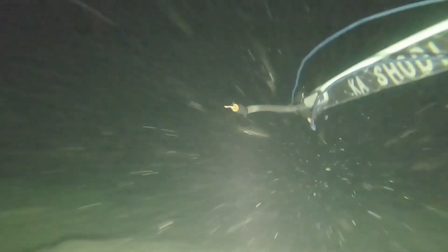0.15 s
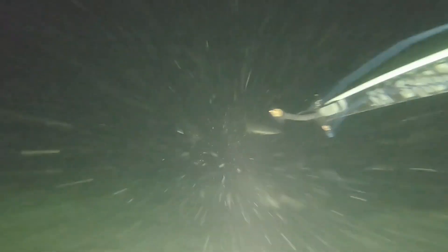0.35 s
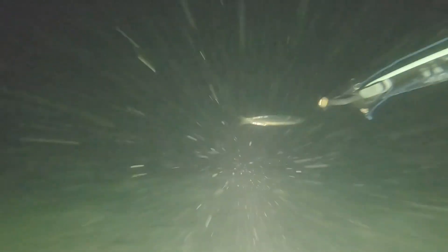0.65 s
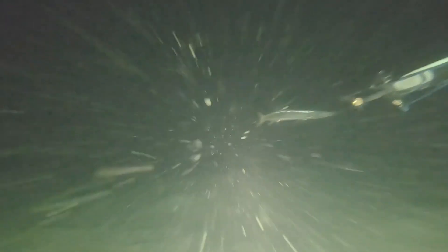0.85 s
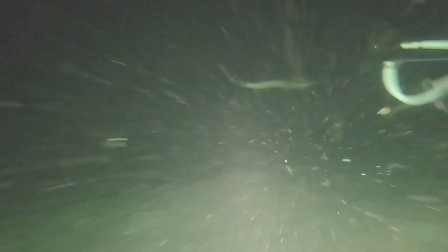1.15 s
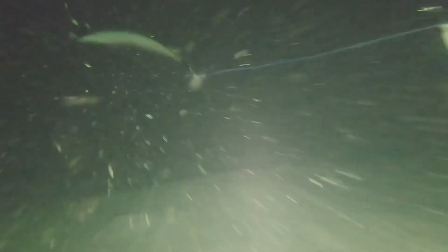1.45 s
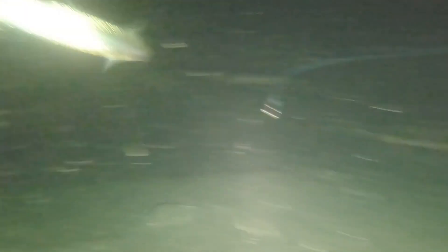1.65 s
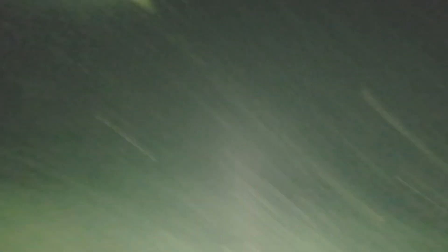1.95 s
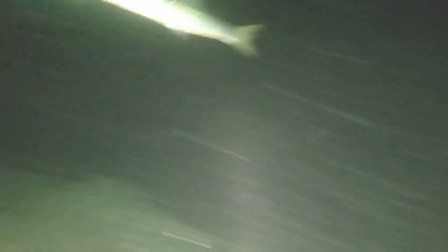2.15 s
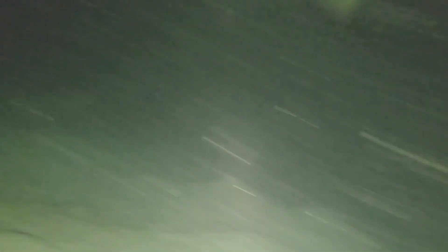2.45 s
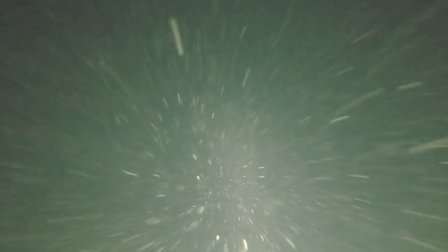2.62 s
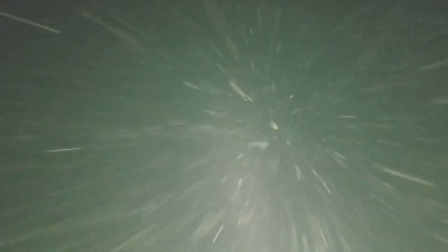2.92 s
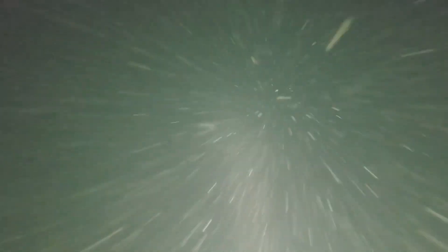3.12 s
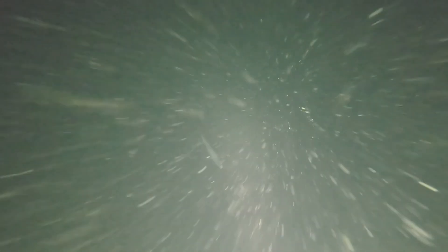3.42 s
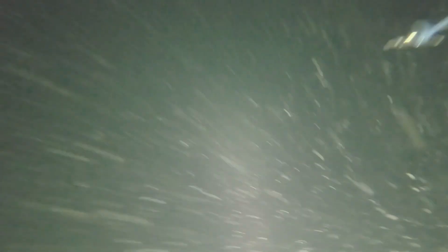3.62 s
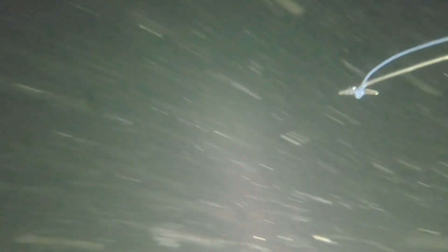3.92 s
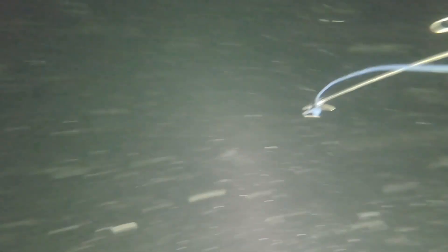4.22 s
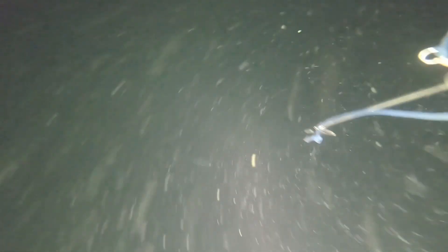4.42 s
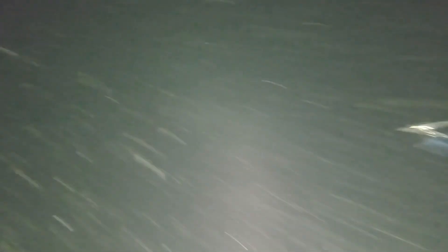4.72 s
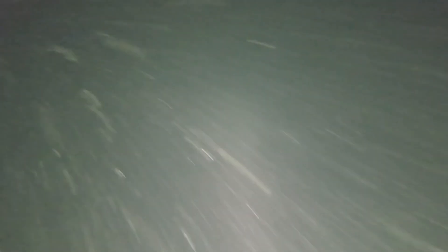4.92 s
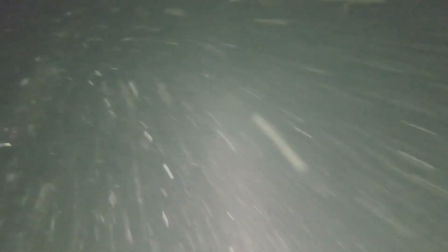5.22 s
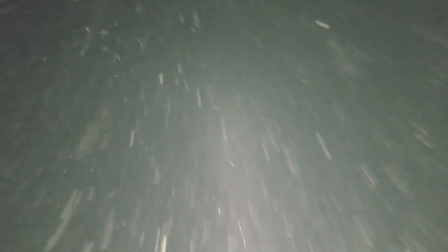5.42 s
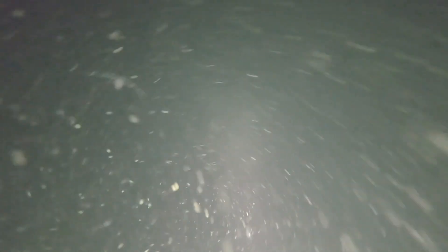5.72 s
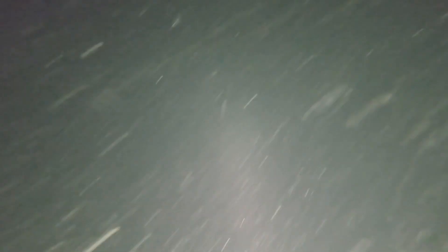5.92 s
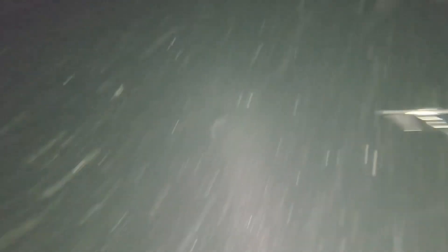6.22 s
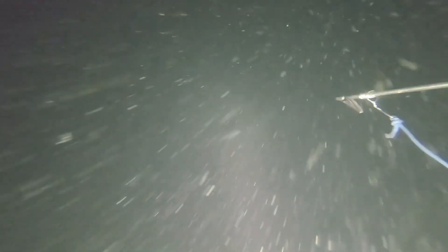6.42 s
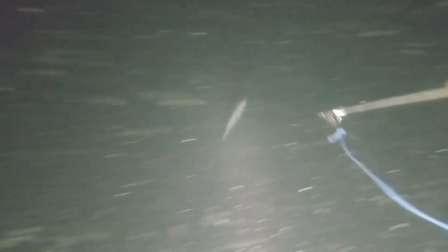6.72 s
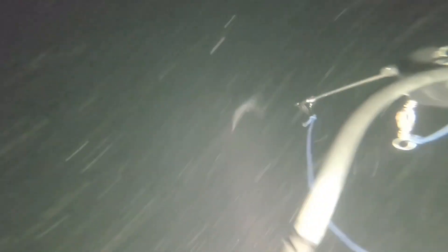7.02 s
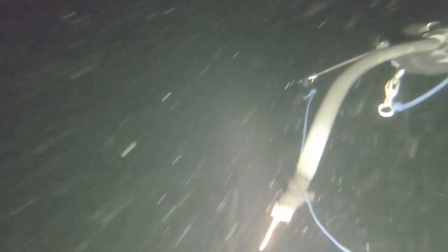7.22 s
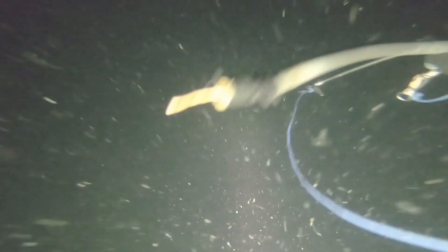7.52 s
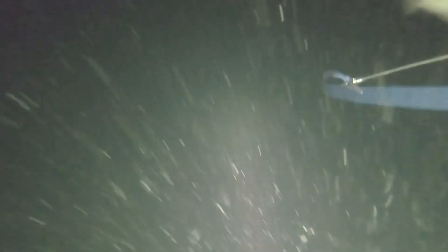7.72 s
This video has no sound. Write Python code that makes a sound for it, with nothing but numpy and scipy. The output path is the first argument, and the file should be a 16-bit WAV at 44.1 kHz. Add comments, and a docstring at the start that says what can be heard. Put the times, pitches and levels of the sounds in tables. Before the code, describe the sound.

Murky water gurgles and rustles around an enclosed camera microphone, with grit ticking and a faint wavering low hum. A speargun discharges beside it, clattering and scraping briefly. Loose knocks continue, the hiss suddenly brightens, deep thuds and a metallic slide come midway, and later the sound narrows to the centre before widening again amid more bumps.

```python
"""Under water at night, heard by the two microphones of a camera in a sealed case on an arm.
Water hisses and ticks past, the case sways and wobbles in the flow, and a faint hum wavers. Near 0.9 s a
speargun fires beside it: taps and bumps ring the case's resonances and the shaft scrapes out. Taps go on.
At 2.62 s one hears a thin click and from there a brighter hiss; near 4.4 s the shaft slides along the gun.
From about 5.1 to 6.4 s the camera folds its two channels almost into one, then the stereo opens again."""
import sys
import numpy as np
from scipy import signal
from scipy.fft import rfft, irfft, next_fast_len
from scipy.io import wavfile
from scipy.ndimage import map_coordinates

SR = 44100
rng = np.random.default_rng(int(sys.argv[2]) if len(sys.argv) > 2 else 0)


def waveform_to_disk(signal):
    """Save audio, clipped to [-1, 1], as 16-bit WAV at the path in sys.argv[1]."""
    frames = np.transpose(np.atleast_2d(signal))
    scaled = np.clip(frames, -1, 1) * 32767
    samples = np.round(scaled).astype(np.int16)
    wavfile.write(sys.argv[1], SR, samples)


N = 346626

# Resonances of the case, by the part that rings: centre_hz, width_hz, relative level_db
WALL_MODES = [(439.4, 30, 3), (617.6, 43.4, 4), (309, 310, -8)]
LID_MODES = [(767, 153, 2.5), (990, 83, -0.5), (1170, 66, 0)]
CAVITY_MODES = [(1508, 69, 7.5), (1730, 305, 11), (1295, 290, 0)]
# Sharp crack of a hard contact: centre_hz, width_hz, relative level_db
CRACK_MODES = [(2700, 860, 0.5), (3140, 580, 6), (3880, 180, -6.5), (4900, 2330, -7.5), (6940, 1300, -20.5),
               (8000, 1100, -16.5)]
LOW_CRACK, HIGH_CRACK = CRACK_MODES[:2], CRACK_MODES[2:]
# Twisting of the case, opposite at the two ports: centre_hz, width_hz, relative level_db
TWIST_MODES = [(725, 200, 0), (1285, 170, 1), (1710, 190, -5), (2900, 1200, -23), (5540, 980, -39),
               (9100, 1800, -59)]
# The case in the flow, ahead of the mix: time_s, churning_db, sway_db
FLOW_ROWS = [(0, -67.5, -56), (.2, -60.5, -53.5), (.3, -54.5, -47), (.5, -54.5, -48), (.66, -57, -37),
             (.77, -60.5, -52), (1.0, -58, -45), (1.5, -71, -52.5), (1.84, -58, -38), (2.1, -58.5, -41.5),
             (2.45, -62, -45.5), (2.62, -64, -44.5), (2.621, -66.5, -61), (2.87, -64.5, -65.5),
             (3.4, -68.5, -52), (3.6, -66, -56.5), (4.02, -71.5, -62), (4.3, -55.5, -47), (4.55, -61, -53),
             (4.9, -66, -59.5), (5.6, -66.5, -53), (5.9, -62, -56), (6.3, -67, -54.5), (6.6, -54, -48),
             (6.8, -64, -51), (7.13, -67.5, -59), (7.5, -63.5, -57.5), (7.86, -72, -54)]
CALM_DB = -65  # churning at which the arm and surge layers have their reference level


def amp(db):
    """Amplitude ratio of a level in dB."""
    return 10 ** (np.asarray(db) / 20)


def unit(x):
    """x scaled to rms 1."""
    return x / np.sqrt(np.mean(x ** 2) + 1e-20)


def along(points, hz):
    """(Hz, value) points read off along a log frequency axis."""
    f, v = np.transpose(points)
    return np.interp(np.log(hz + 1), np.log(f + 1), v)


def curves(rows, outside=None):
    """One value per sample for each column after the time."""
    times_s, *columns = np.transpose(rows)
    t = np.arange(N) / SR
    return [np.interp(t, times_s, column, outside, outside) for column in columns]


def wander(rate):
    """A smooth random curve, rate knots a second."""
    knots = rng.standard_normal(int(N * rate / SR) + 4)
    return map_coordinates(knots, [np.arange(N) * rate / SR])


def filtered(x, response):
    """x times a complex response of frequency, padded so that tails do not wrap round at once."""
    length = x.shape[-1]
    m = next_fast_len(length + min(length // 2, SR // 5), True)
    spectrum = rfft(x, m) * response(np.fft.rfftfreq(m, 1 / SR))
    return irfft(spectrum, m)[..., :length]


def modes(table):
    """The causal response of a set of resonances; the thick wall dulls what lies far from them."""
    low_hz = 0.82 * min(row[0] for row in table)
    top_hz = 1.137 * max(row[0] for row in table)

    def response(f):
        ring = 0
        for k, (centre, width, db) in enumerate(table):
            mode = 1j * f * width / (centre * centre - f * f + 1j * f * width)
            ring = ring + (-1) ** k * amp(db) * mode  # neighbours alternate in sign
        return ring * (1j * f / (low_hz + 1j * f)) ** 2 / (1 + 1j * f / top_hz) ** 4
    return response


def coloured(x, spectrum):
    """x given a spectrum, rms 1."""
    return unit(filtered(x, lambda hz: amp(along(spectrum, hz))))


def summed_db(levels_db, offsets_db):
    """Level of several parts added in power."""
    return 10 * np.log10(sum(amp(a + b) ** 2 for a, b in zip(levels_db, offsets_db)))


def stirring(ticks):
    """Strength of the flow: uneven swells, and ticks of a few ms, each of its own size."""
    sizes = np.zeros(N)
    size_db = np.minimum(4 * rng.exponential(size=len(ticks)), 13)
    sizes[ticks] = amp(size_db + rng.normal(0, 3.4, len(ticks)))
    t = np.arange(SR // 100) / SR
    pulse = (1 - np.exp(-t / 0.00099)) * np.exp(-t / 0.0012)
    swells = amp(2 * wander(40) + 1.3 * wander(12))
    return swells + 2.86 * signal.fftconvolve(sizes, pulse)[:N]


def water():
    """Hiss, with grit and small bubbles ticking against the case, heard by one port a little late."""
    # Water past the case, relative levels: time_s, gurgle_db, rustle_db, sizzle_db, fizz_db
    water_rows = [(0, -58, -48, -67.5, -68), (.41, -44.5, -49, -67, -66), (.9, -55, -52, -69, -71.5),
                  (1.5, -62.5, -55.5, -71, -74.5), (2.0, -53, -53, -70, -71.5),
                  (2.25, -63.5, -51.5, -65.5, -69), (2.62, -57, -50, -68, -68),
                  (2.621, -57, -45, -54.5, -60), (3.21, -58.5, -47, -59.5, -63),
                  (3.56, -54.5, -49.5, -62.5, -64.5), (3.88, -60.5, -47.5, -60, -61.5),
                  (4.31, -51, -50.5, -67, -67.5), (4.49, -64, -62, -63, -78), (4.75, -56, -53, -62, -73.5),
                  (5.04, -62.5, -53, -61, -70.5), (5.3, -53, -48, -53.5, -68),
                  (5.75, -50.5, -48, -53.5, -67.5), (6.5, -51.5, -47, -52.5, -64),
                  (6.76, -53.5, -53, -57, -66), (7.38, -57.5, -49.5, -57.5, -63),
                  (7.86, -53.5, -49, -58.5, -62.5)]
    # Spectra of the layers: frequency_hz, level_db per Hz
    surge_spectrum = [(150, -12), (250, -19), (356, -2), (500, -8.5), (650, -20.5), (1100, -120)]
    gurgle_spectrum = [(280, -70), (480, -9.5), (612, -0.5), (679, -2.5), (759, -7.5), (1000, -8),
                       (1300, -32), (2200, -120)]
    rustle_spectrum = [(560, -56), (950, -15.5), (1020, -26), (1090, -2), (1210, -5.5), (1300, -4),
                       (1420, -4.5), (1570, 1), (1640, 5), (1710, -5), (1930, -3.5), (2140, -8.5),
                       (2300, -13), (2990, -55.5), (5060, -120)]
    sizzle_spectrum = [(1350, -46), (2300, -2.5), (2750, 1.5), (3240, 5), (3440, -1.5), (3770, -3),
                       (3970, -14.5), (4200, -6.5), (5460, -48), (9240, -120)]
    fizz_spectrum = [(2470, -31), (4200, -13.5), (4590, -16), (4940, -2.5), (5400, -0.5), (5940, -6),
                     (7430, -14), (8890, -8.5), (11600, -26), (13500, -28.5), (16000, -60)]
    # The water's opposite part at the ports: frequency_hz, level_db per Hz
    across_spectrum = [(59, -43), (100, -30), (189, -21), (302, -52), (381, -40.5), (471, -29), (721, 1.5),
                       (991, -11.5), (1250, -7.5), (2520, -25.5), (3120, -22), (4200, -41.5), (5420, -36),
                       (9820, -45), (16000, -67)]
    port_lag_s = 0.00048  # the left port hears the water later by this
    surge_calm_db, surge_grows = -69.5, 2.13  # relative dB when calm; dB per dB of churning
    across_db = (2.5, 4)  # the opposite part over gurgle and rustle; other layers do not count

    hiss_db = curves(water_rows)
    surge_db = surge_calm_db + surge_grows * (curves(FLOW_ROWS)[0] - CALM_DB)
    ticks = np.flatnonzero(rng.random(N) < 70 / SR * amp(5 * wander(6)))  # grit comes in clumps
    near, stray = rng.standard_normal((2, N))

    # a lag turns the ports' sum as a cosine and their difference as a sine; only the signs are kept
    def both(v):
        return filtered(v, lambda hz: np.sign(np.cos(np.pi * hz * port_lag_s)))

    def apart(v):
        return filtered(v, lambda hz: -1j * np.sign(np.sin(np.pi * hz * port_lag_s)))

    # a tick need not excite all modes alike
    low, middle, high = stirring(ticks), stirring(ticks), stirring(ticks)
    low_rush, middle_rush, high_rush = [both(flow * near) for flow in (low, middle, high)]
    gurgle_db, rustle_db, sizzle_db, fizz_db = hiss_db
    layers = [(surge_db, surge_spectrum, stray), (gurgle_db, gurgle_spectrum, low_rush),
              (rustle_db, rustle_spectrum, middle_rush), (sizzle_db, sizzle_spectrum, high_rush),
              (fizz_db, fizz_spectrum, high_rush)]
    common = sum(amp(db - 2.0) * coloured(rush, spectrum) for db, spectrum, rush in layers)
    difference = apart(middle * near) + 0.64 * middle * stray
    opposite = amp(summed_db(hiss_db, across_db)) * coloured(difference, across_spectrum)
    opposite += 0.75 * amp(surge_db) * coloured(near, surge_spectrum)
    return np.array([common, opposite])


def mount():
    """The case sways, wobbles near one pitch on its arm, and the flow swishes round it."""
    # Spectra of slow sway, stirred arm and swish: frequency_hz, level_db per Hz
    sway_spectrum = [(8.8, -21), (15, -1.5), (50, -6), (65, -47), (110, -120)]
    arm_spectrum = [(30, -61), (48, -18), (68, 0), (95, -15), (150, -73.5)]
    swish_spectrum = [(60, -44), (100, -3.5), (160, -1), (210, -2), (270, -11.5), (500, -74)]
    wobble_hz = 72.7
    arm_calm_db, arm_grows = -61.5, 1.66  # relative dB when calm; dB per dB of churning

    churn_db, sway_db = curves(FLOW_ROWS)
    sway = amp(2.5 * wander(6)) * coloured(rng.standard_normal(N), sway_spectrum)
    phase = 2 * np.pi * np.cumsum(wobble_hz * (1 + 0.0605 * wander(12))) / SR
    wobble = swing() * np.sin(phase)
    arm_db = arm_calm_db + arm_grows * (churn_db - CALM_DB)
    stirred = amp(arm_db) * coloured(rng.standard_normal(N), arm_spectrum)
    swish = coloured(amp(5.1 * wander(30)) * rng.standard_normal(N), swish_spectrum)
    return amp(sway_db) * sway + wobble + stirred + amp(churn_db) * swish


def hum():
    """A faint low tone wavers in pitch and level."""
    pitch_hz = 175 * np.exp(.16 * wander(3) + 0.0598 * wander(15))
    return amp(-62.5 + 3 * wander(8)) * np.sin(2 * np.pi * np.cumsum(pitch_hz) / SR)


def taps():
    """A ragged contact rings each group of case modes; returns the common and the opposite part."""
    # Contacts: start_s, wall_db, lid_db, cavity_db (relative energies of the ring), contact_ms
    tap_rows = [(.262, -62, -84, -59, 2.8), (0.9033, -69, -71, -47, 5.5), (.91, -74, -49, -37, 11),
                (0.914, -72, -55, -45, 26), (.934, -60, -63, -39.5, 5.6), (0.9396, -69, -42.5, -38, 3.1),
                (0.957, -53, -68, -64, 7.6), (0.9637, -64, -52, -42.5, 15),
                (.9761, -72, -45.5, -45.5, 13.6), (0.986, -66, -65, -58, 2), (1.3551, -84, -84, -57, 12.4),
                (1.5615, -86, -57.5, -69, 29), (1.6259, -73, -41.5, -48, 4.6), (1.6785, -88, -55, -55, 6),
                (1.8049, -74, -50.5, -44.5, 2.5), (2.0056, -53.5, -45.5, -56, 10),
                (2.017, -76, -45.5, -43, 3.7), (2.0251, -74, -50, -49.5, 4.7), (2.132, -53, -50, -46, 3.3),
                (2.147, -81, -47.5, -41.5, 7), (2.1632, -60, -50.5, -41, 4.1), (2.176, -65, -57, -52, 8),
                (2.4418, -69, -73, -65.5, 7.9), (2.714, -64.5, -64, -73, 12), (3.357, -56.5, -47, -63, 20),
                (3.381, -75, -49, -43.5, 3.2), (3.474, -88, -84, -58, 3.7), (3.493, -76, -54, -48.5, 5.4),
                (3.517, -80, -66, -60, 5.3), (3.5972, -69, -50.5, -42, 1.2), (3.6165, -80, -83, -63.5, 6),
                (3.6274, -84, -81, -60.5, 8.4), (3.862, -84, -89, -60.5, 11),
                (4.1104, -35, -49.5, -46, 5.1), (4.154, -32, -50, -52, 15),
                (4.1766, -52.5, -56, -43.5, 8.2), (4.239, -88, -84, -61.5, 2.5),
                (4.3117, -38.5, -61, -57, 2.9), (4.332, -54, -80, -70, 5), (4.342, -74, -78, -49.5, 23),
                (4.398, -65, -69, -43, 12), (4.4057, -35.5, -42.5, -30.5, 5.3),
                (4.4268, -52.5, -71, -44.5, 24), (4.447, -45, -73, -47.5, 8.2),
                (4.5209, -58.5, -55, -68, 10), (4.5494, -67, -63, -52, 11.5), (4.562, -60, -62, -72, 5.3),
                (4.6315, -66, -52.5, -61, 38), (4.8533, -96, -85, -60.5, 9.9),
                (5.1812, -91, -87, -59.5, 2.2), (5.336, -55, -48, -73, 12), (5.6322, -89, -80, -56, 30),
                (5.7966, -78, -47, -40.5, 5.6), (5.837, -66, -58, -56.5, 4), (6.003, -80, -76, -59.5, 4.5),
                (6.02, -59.5, -54, -68, 3.3), (6.0551, -62.5, -58.5, -58.5, 9),
                (6.1217, -80, -78, -54.5, 7), (6.383, -82, -70, -56, 25), (6.397, -58, -46.5, -51, 14),
                (6.4107, -81, -55, -48, 4), (6.4167, -57, -56, -67, 13), (6.4684, -46, -81, -73, 7.7),
                (6.478, -76, -58, -64, 5), (6.58, -57, -64, -57, 43), (6.5989, -64, -56.5, -48, 10.6),
                (6.68, -52.5, -57, -48, 13), (6.691, -72, -57, -50.5, 22), (6.7306, -49.5, -52.5, -61, 14),
                (6.997, -59.5, -57.5, -59, 20), (7.2088, -90, -83, -59, 29),
                (7.2376, -55.5, -49.5, -47, 16.3), (7.2938, -62.5, -54.5, -80, 8.9),
                (7.407, -51.5, -50, -46, 9), (7.4293, -52.5, -53, -60, 18), (7.6594, -91, -73, -51, 4.9),
                (7.6786, -90, -88, -56, 7.3), (7.731, -92, -90, -61, 0.79), (7.7395, -93, -72, -46, 6.6)]
    # level at the reference cavity energy; dB per dB of cavity; dB lost per dB that misses the cavity
    crack_ref_db, crack_grows, crack_dulls = -62, 0.84, 1.3
    edge_ref_db, edge_grows, edge_dulls = -73, 0.85, 4.4  # the same law for the highest crack modes
    twist_offsets_db = (-8, 2.5, -1.5)  # what wall, lid and cavity each pass to the twisting modes
    wall_leans = 0.39  # share of the wall's ring that leans to the left port

    starts_s, wall_db, lid_db, cavity_db, contact_ms = np.transpose(tap_rows)
    body_db = [wall_db, lid_db, cavity_db]
    missed_db = summed_db(body_db, np.zeros(3)) - cavity_db
    crack_db = crack_ref_db + crack_grows * (cavity_db + 50) - crack_dulls * missed_db
    edge_db = edge_ref_db + edge_grows * (cavity_db + 49.5) - edge_dulls * missed_db
    twist_db = summed_db(body_db, twist_offsets_db)

    t = np.arange(SR // 10) / SR
    contact_s = contact_ms[:, None] / 1000
    shape = (1 - np.exp(-t / (0.038 * contact_s))) * amp(-15 * t / contact_s)
    noise = rng.standard_normal((len(starts_s), 2, len(t))).swapaxes(0, 1)
    common, opposite = shape * noise
    push = np.exp(-((t - .0012) / 0.00015) ** 2)  # the clean first blow, felt most by the low modes
    groups = [(WALL_MODES, common + 5 * push, wall_db), (LID_MODES, common + 3 * push, lid_db),
              (CAVITY_MODES, common + 1.42 * push, cavity_db), (LOW_CRACK, common, crack_db),
              (HIGH_CRACK, common, edge_db), (TWIST_MODES, opposite - 1.16 * push, twist_db)]

    parts = np.zeros((2, N + len(t)))  # common, opposite
    for table, force, db in groups:
        rings = filtered(force, modes(table))
        rings *= np.sqrt(SR / np.sum(rings ** 2, axis=1, keepdims=True))  # equal energy
        rings *= amp(db[:, None] - 3.5)
        for start_s, ring in zip(starts_s, rings):
            i = round(start_s * SR)
            parts[int(table is TWIST_MODES), i:][:len(t)] += ring
            if table is WALL_MODES:
                parts[1, i:][:len(t)] += wall_leans * ring
            if table is LOW_CRACK or table is HIGH_CRACK:  # the crack reaches the ports unevenly
                side = np.sign(rng.normal())
                parts[1, i + 9:][:len(t) - 9] += 0.9 * side * ring[:-9]
    return parts[:, :N]


def bumps():
    """Soft blows against the case each give a few low cycles."""
    # Dull bumps, ahead of the mix: start_s, level_db, pitch_hz
    bump_rows = [(.32, -46, 155), (.919, -31.5, 174), (0.944, -22.5, 157), (0.976, -25, 197),
                 (1.627, -31.5, 166), (2.019, -33, 167), (2.151, -34.5, 166), (2.407, -30.5, 166),
                 (2.602, -45, 144), (3.359, -38.5, 165), (4.111, -23, 170), (4.155, -18.5, 168),
                 (4.313, -24, 150), (4.407, -24.5, 170), (5.337, -37, 163), (6.469, -18, 332),
                 (6.479, -27.5, 138), (6.545, -36.5, 169), (7.241, -40.5, 175), (7.409, -36, 160)]
    cycles = 9  # to die by 60 dB
    out, t = np.zeros(N + SR), np.arange(SR // 10) / SR
    for start_s, db, hz in bump_rows:
        envelope = amp(db - 60 * t * hz / cycles) * (1 - np.exp(-t / 0.00033))
        out[round(start_s * SR):][:len(t)] += envelope * np.sin(2 * np.pi * hz * t)
    return out[:N]


def scrape(rows, wall_db, twist_db, edge_db):
    """Steel dragging over the gun: dense uneven catches in the case modes."""
    cavity_db, crack_db = curves(rows, outside=-150)
    catches = amp(8.1 * np.tanh(wander(250))) * rng.standard_normal((2, N))
    common = amp(cavity_db - 7.5) * unit(filtered(catches[0], modes(CAVITY_MODES + LID_MODES)))
    common += amp(cavity_db + wall_db) * unit(filtered(catches[0], modes(WALL_MODES)))
    low, high = (unit(filtered(catches, modes(part))) for part in (LOW_CRACK, HIGH_CRACK))
    crack = amp(crack_db) * (low + amp(edge_db) * high)
    opposite = amp(cavity_db + twist_db) * unit(filtered(catches[1], modes(TWIST_MODES)))
    return np.array([common + amp(-7.0) * crack[0], opposite + amp(-6) * crack[1]])


def swing():
    """Size of the case's swing: each jolt builds it in a cycle, then it dies away, wide swings faster."""
    # Jolts that set the case swinging on its arm, ahead of the mix: start_s, level_db
    jolt_rows = [(.93, -31), (1.0, -34), (1.63, -24), (1.819, -37), (1.889, -36), (2.025, -28.5),
                 (2.12, -24.5), (2.439, -31.5), (2.54, -39), (2.949, -43), (3.36, -37.5), (4.119, -22),
                 (4.171, -17), (4.31, -35), (4.53, -33), (4.559, -30.5), (4.635, -32.5), (5.334, -36),
                 (5.87, -47), (6.409, -31), (6.477, -17.5), (6.545, -24), (6.685, -25.5), (6.99, -38),
                 (7.241, -40), (7.411, -32), (7.445, -25.5)]
    decay_s, drag_s = 0.28, 0.0059  # 60 dB decay of a -33 dB jolt; s shorter per dB of a wider swing
    size, t = np.zeros(N + SR), np.arange(SR // 3) / SR
    for start_s, db in jolt_rows:
        t60 = max(decay_s - drag_s * (db + 33), .1)
        jolt = amp(db - 60 * t / t60) * (1 - np.exp(-t / 0.0072))
        part = size[round(start_s * SR):][:len(t)]
        part[:] = np.maximum(part, jolt)  # the wider swing prevails
    return size[:N]


def click():
    """A thin click, one bare sample, just as the hiss becomes brighter."""
    out = np.zeros(N)
    out[round(2.622 * SR)] = amp(-36.5)
    return out


def scene():
    """The two ports hear the common part alike, but for a lean, and the opposite part inverted."""
    # Shaft scraping out of the gun: time_s, relative cavity_db, relative crack_db
    release_rows = [(.9, -45, -59), (.905, -21, -34), (.917, -20, -25), (.955, -26.5, -47),
                    (.964, -14, -28), (.979, -21.5, -24.5), (.988, -23, -38), (1.0, -53, -67)]
    # Shaft sliding along the gun: time_s, relative cavity_db, relative crack_db
    slide_rows = [(4.3, -59, -75), (4.33, -47, -51), (4.35, -34, -58), (4.38, -33, -49),
                  (4.404, -28.5, -36), (4.425, -29.5, -62), (4.452, -37, -25.5), (4.49, -75, -85)]
    # Lean of the common part: frequency_hz, share leaning left (negative: right)
    lean_points = [(500, -0.1), (1000, -0.57), (1900, -0.32), (3300, -0.16), (5500, 0.25), (12000, .1)]
    release = scrape(release_rows, wall_db=-18.5, twist_db=-2.5, edge_db=-4)
    slide = scrape(slide_rows, wall_db=-16.5, twist_db=-13, edge_db=-7.5)
    common, opposite = water() + taps() + release + slide
    lean = filtered(common, lambda hz: along(lean_points, hz))
    opposite = opposite + hum() + lean
    low = amp(3.5) * (mount() + bumps() + click())
    return np.array([common + opposite + low, common - opposite + low])


def record(dry):
    """The camera narrows its stereo for a while and keeps nothing above its band limit."""
    # Stereo width: time_s, level_db of the difference between the channels
    width_rows = [(0, -0.5), (4.4, -1.5), (5.1, -42), (5.35, -62), (6.37, -55), (6.45, -17.5), (6.85, -6),
                  (7.5, -2)]
    top_hz = 16300
    mid = (dry[0] + dry[1]) / 2
    side = (dry[0] - dry[1]) / 2 * amp(curves(width_rows)[0])
    stereo = np.array([mid + side, mid - side])
    return np.clip(filtered(stereo, lambda hz: hz < top_hz), -.99, .99)


dry = scene()
out = record(dry)
waveform_to_disk(out)
```